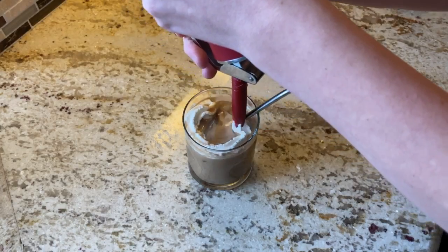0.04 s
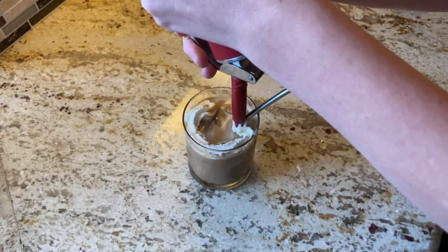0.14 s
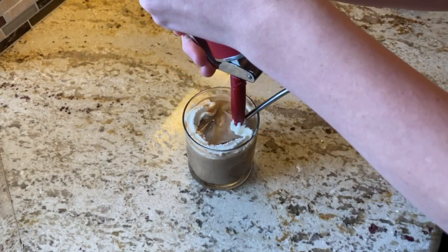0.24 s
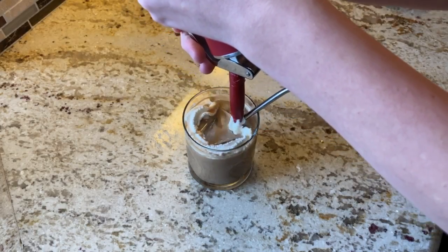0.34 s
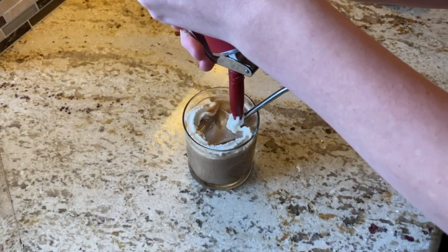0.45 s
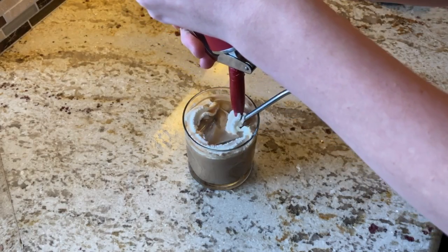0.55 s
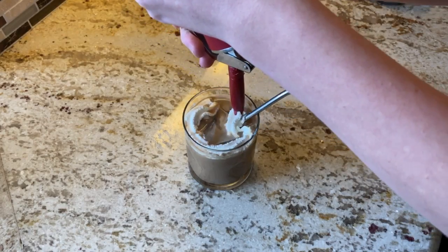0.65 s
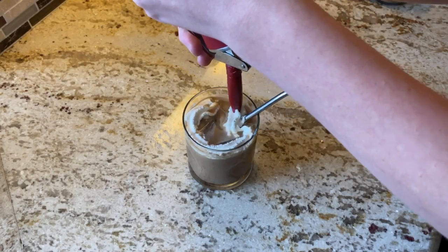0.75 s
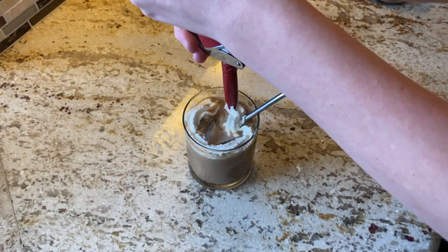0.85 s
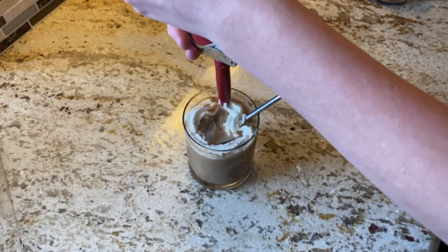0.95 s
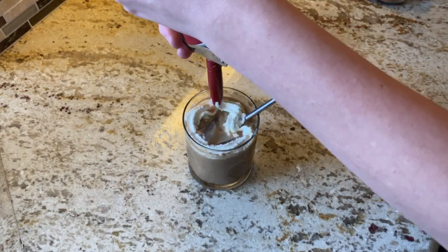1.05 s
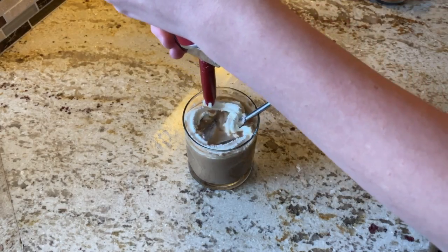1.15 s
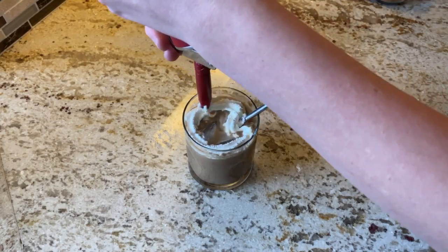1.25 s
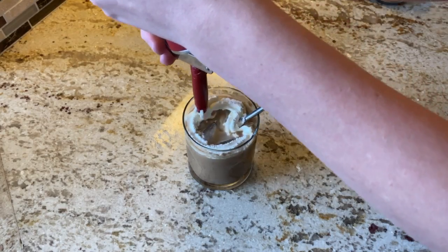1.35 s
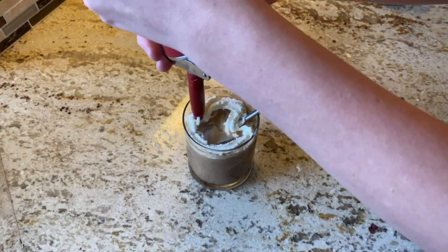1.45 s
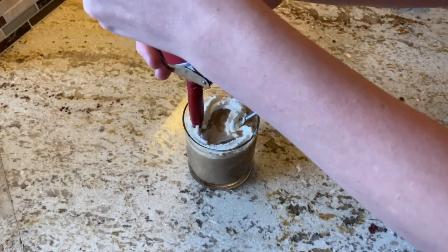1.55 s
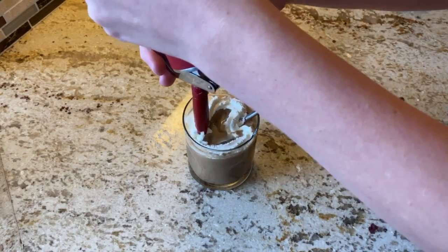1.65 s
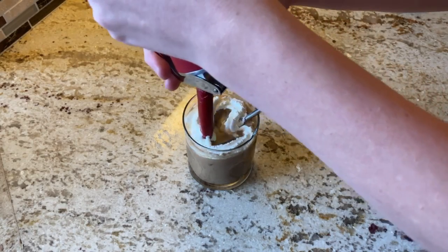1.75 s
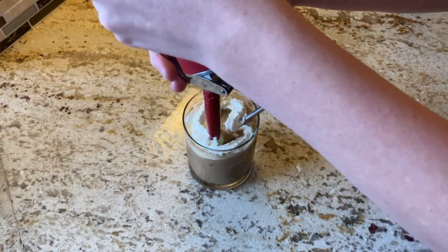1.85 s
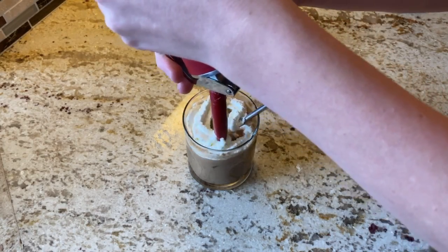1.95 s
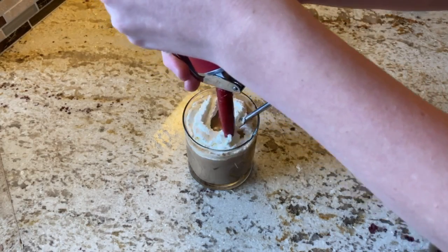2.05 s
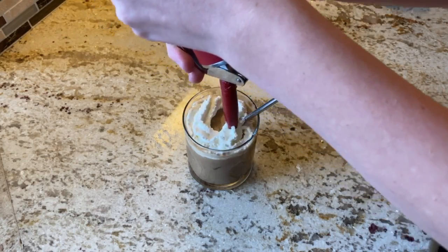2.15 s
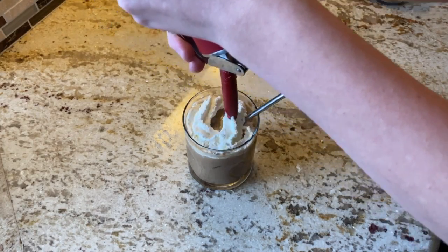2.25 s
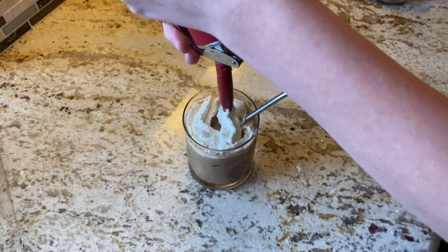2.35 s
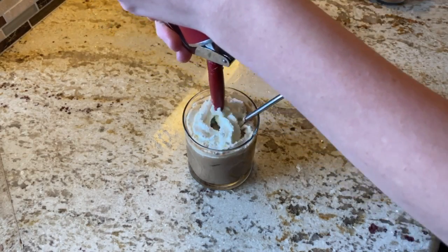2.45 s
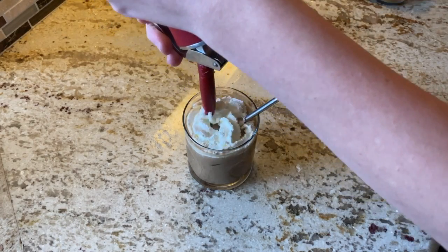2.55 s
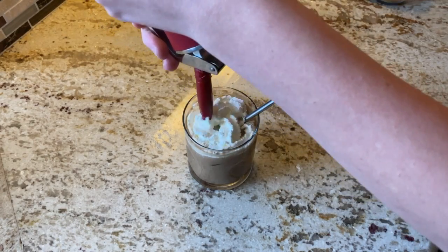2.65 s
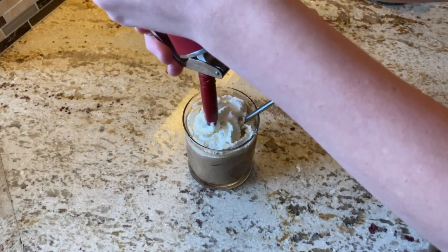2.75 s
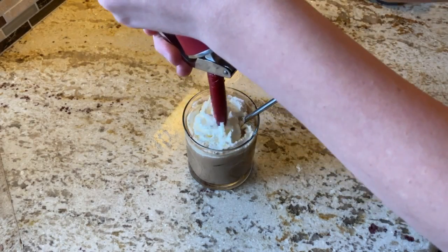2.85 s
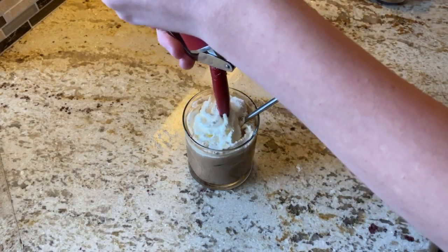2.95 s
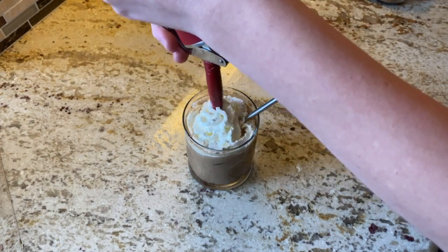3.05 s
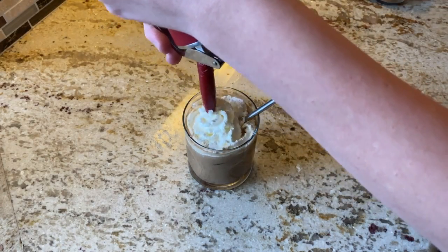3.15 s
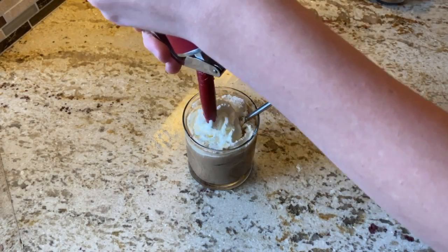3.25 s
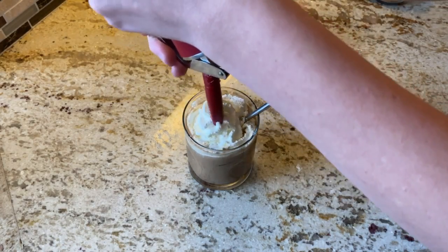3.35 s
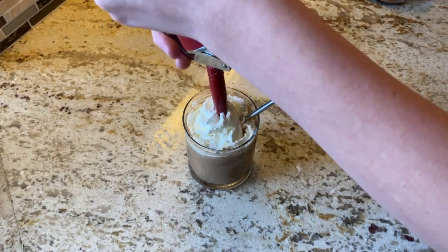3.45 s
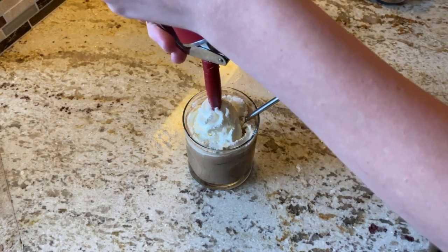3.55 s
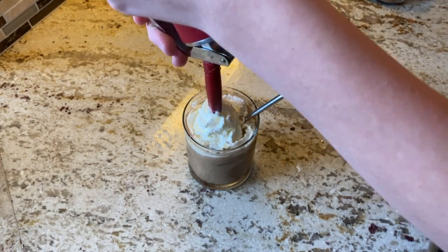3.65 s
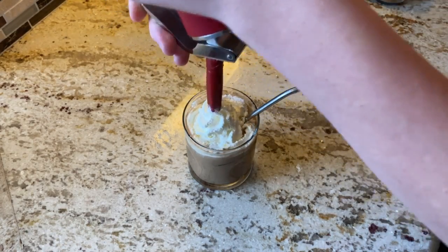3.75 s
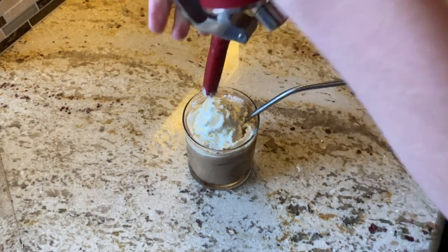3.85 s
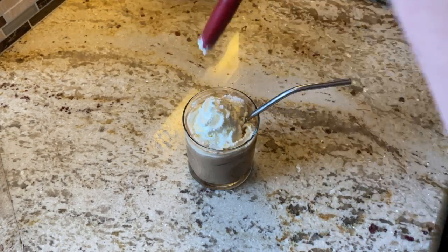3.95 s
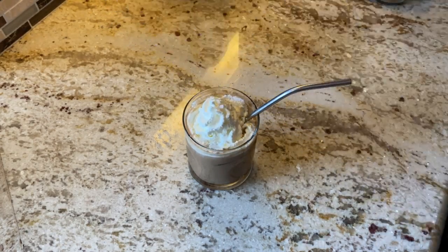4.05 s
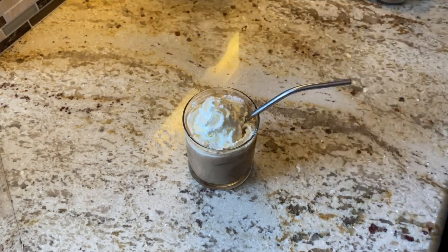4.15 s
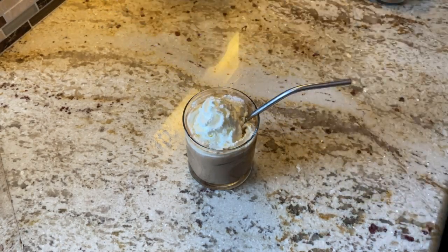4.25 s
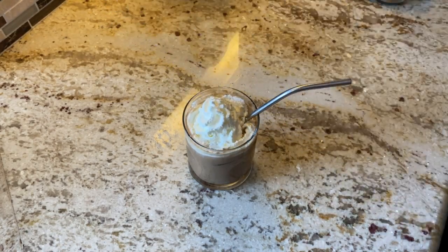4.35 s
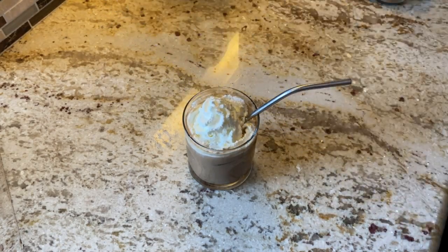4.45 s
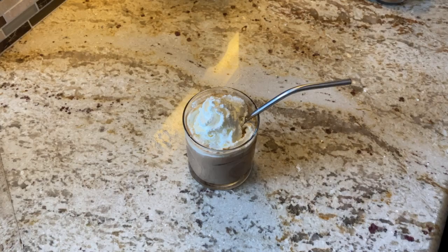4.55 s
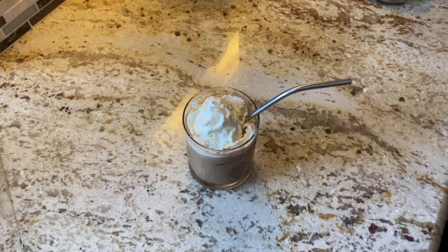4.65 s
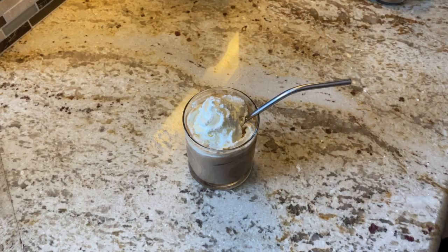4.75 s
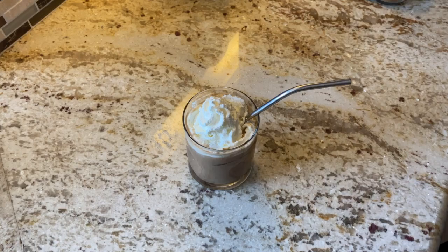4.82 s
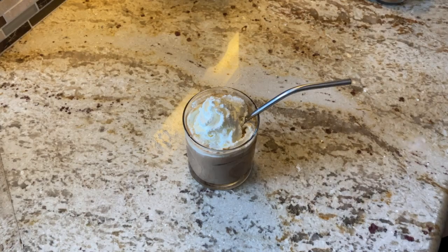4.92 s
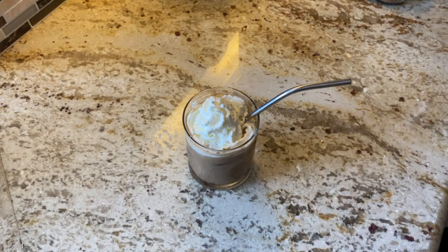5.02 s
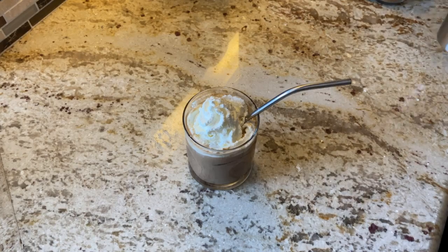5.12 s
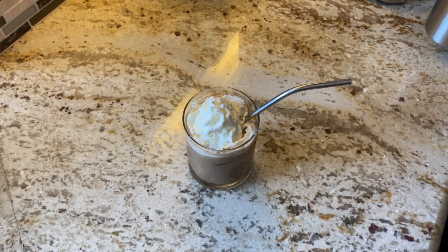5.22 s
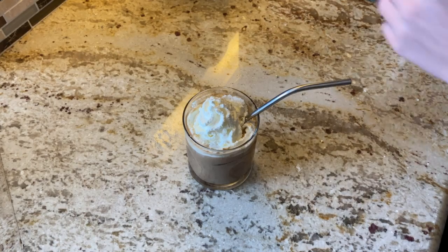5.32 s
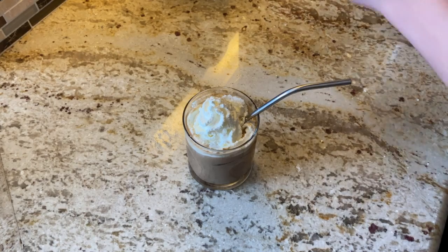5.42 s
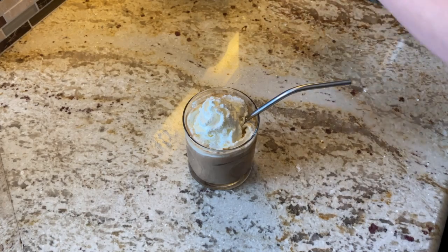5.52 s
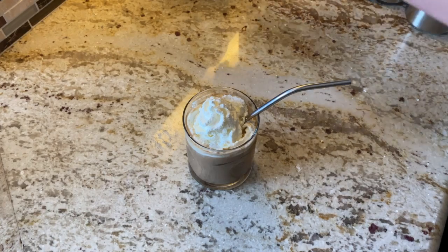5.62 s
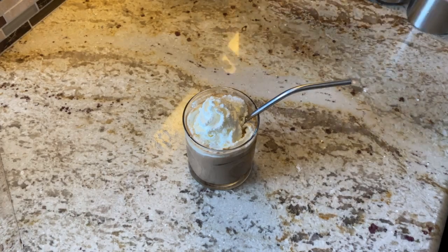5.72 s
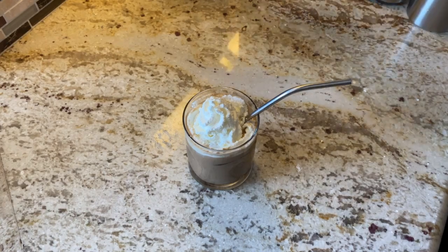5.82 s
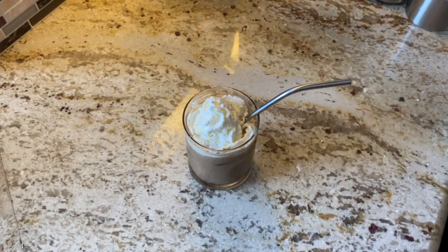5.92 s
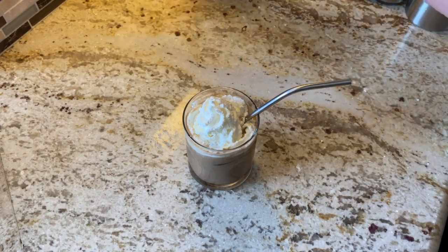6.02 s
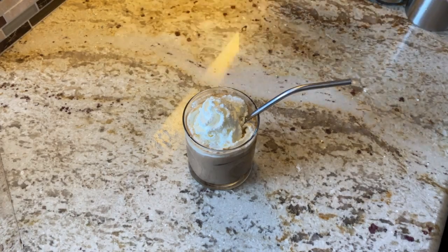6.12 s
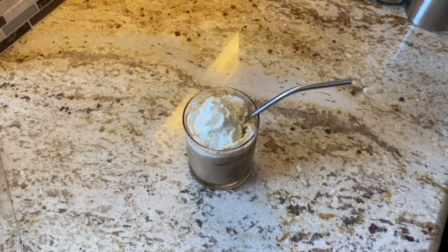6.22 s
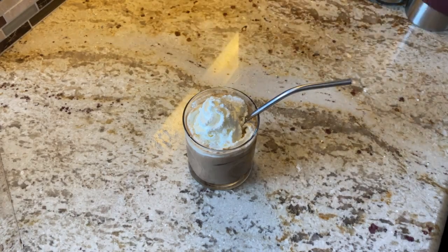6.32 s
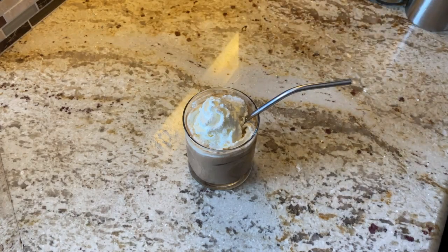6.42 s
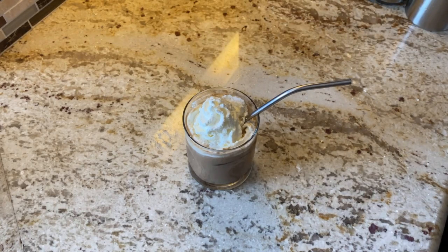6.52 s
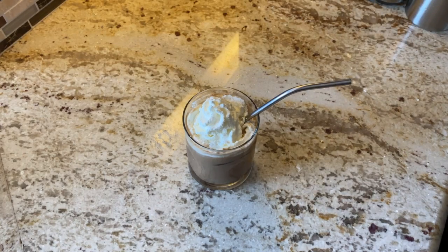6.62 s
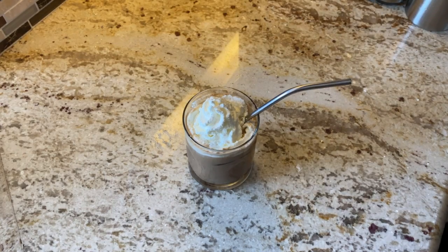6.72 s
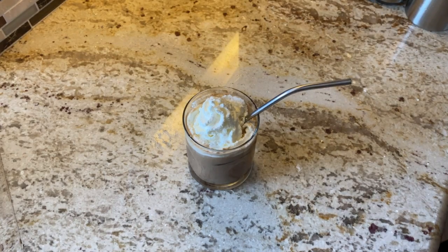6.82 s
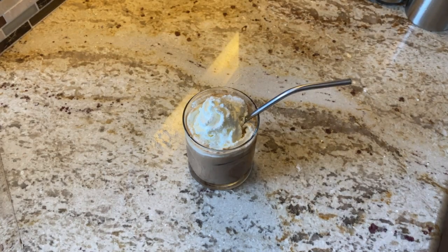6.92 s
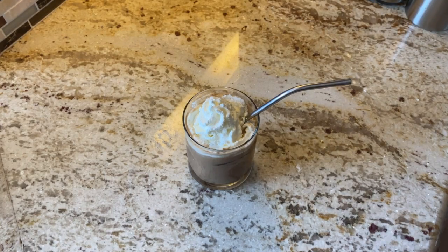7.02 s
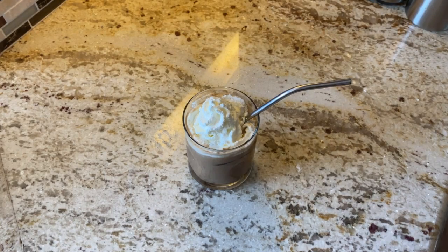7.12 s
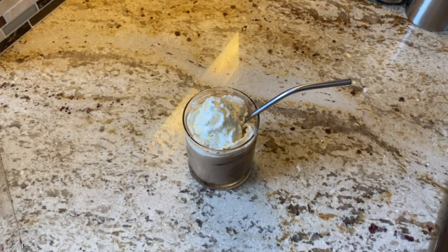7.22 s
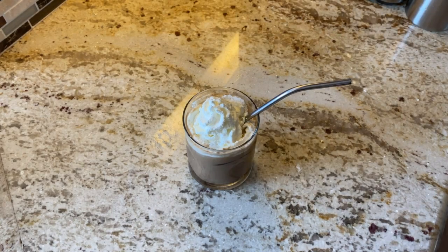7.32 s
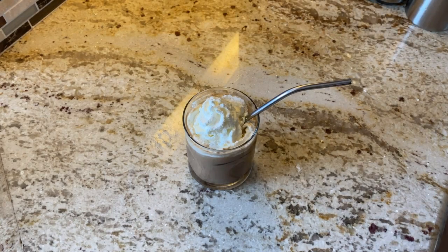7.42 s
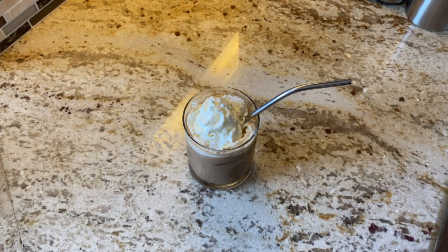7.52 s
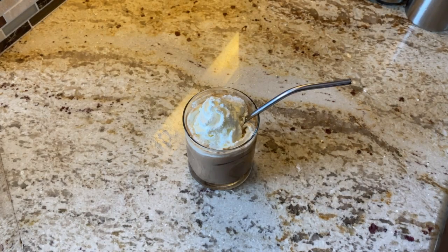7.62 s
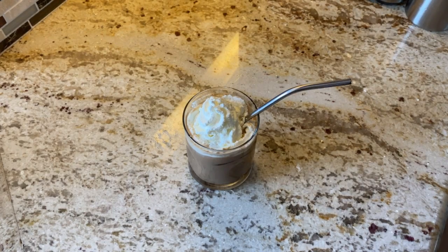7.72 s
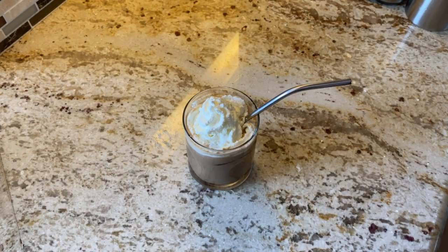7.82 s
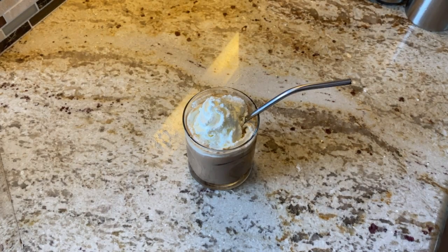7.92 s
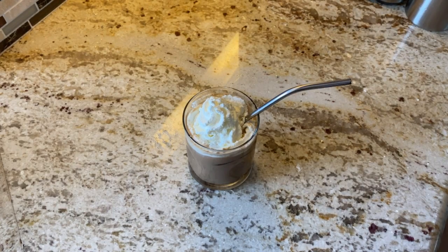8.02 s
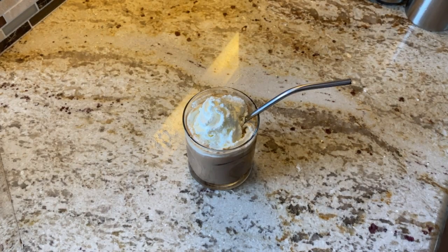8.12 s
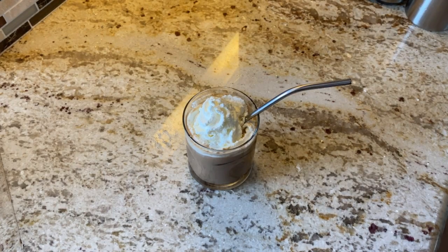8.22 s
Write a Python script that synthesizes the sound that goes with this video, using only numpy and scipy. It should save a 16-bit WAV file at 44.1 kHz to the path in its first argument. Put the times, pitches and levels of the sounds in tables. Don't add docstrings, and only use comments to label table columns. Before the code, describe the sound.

A whipped cream dispenser sputters and hisses into a glass, stops, then cloth rustles, metal knocks down twice on stone, and something clacks further right.

```python
import sys
import numpy as np
from scipy import signal
from scipy.fft import rfft, irfft
from scipy.io import wavfile
from scipy.ndimage import uniform_filter1d

SR = 44100
rng = np.random.default_rng(int(sys.argv[2]) if len(sys.argv) > 2 else 0)


def to_linear_factor(level_db):
    exponent = np.asarray(level_db, float) / 20
    return 10 ** exponent


def to_wav(sig):
    pcm = np.clip(np.atleast_2d(sig), -1, 1) * 32767
    pcm = np.round(pcm).astype(np.int16)
    wavfile.write(sys.argv[1], SR, pcm.T)


N = 364707
TIME = np.arange(N) / SR

# start in seconds, peak in dB, pitch in Hz, treble against peak in dB.
POPS = [(0.036, -40.5, 1790, -11), (0.091, -46.5, 1010, -10), (0.156, -43, 1140, -22.5),
        (0.362, -42.5, 1630, -11), (0.584, -40, 1200, -24), (0.64, -44.5, 1250, -21),
        (0.71, -40.5, 1240, -30), (0.827, -40, 1260, -27), (0.869, -44, 1190, -26), (0.965, -38, 1200, -18),
        (1.007, -38.5, 1190, -14), (1.233, -38, 1600, -13.5), (1.291, -39.5, 1830, -22),
        (1.662, -42.5, 1000, -19), (1.857, -41.5, 1290, -20), (1.984, -44, 1120, -22),
        (2.161, -40, 1190, -25), (2.213, -35.5, 1140, -21), (2.478, -45, 1180, -20),
        (2.506, -37.5, 1200, -19), (2.618, -37, 1160, -12), (2.828, -41, 1250, -11.5),
        (2.898, -38.5, 1130, -10), (2.947, -39, 1010, -24), (3.034, -36, 1140, -10), (3.095, -39, 1540, -9),
        (3.225, -37.5, 1280, -22), (3.285, -40, 1010, -20), (3.325, -40.5, 1000, -10.5),
        (3.53, -33.5, 1630, -22)]
# start in seconds, peak in dB, pitch in Hz, treble against peak in dB.
LESSER = [(0.27, -50, 1850, -16), (0.284, -42.5, 1230, -10), (0.38, -53, 1630, -14), (0.435, -44, 1010, -9),
          (0.525, -45.5, 1180, -21), (0.557, -46, 1430, -12), (0.659, -38, 1140, -12),
          (0.908, -39, 1880, -10), (0.921, -41, 1630, -20), (1.084, -41, 1010, -16),
          (1.116, -43, 1190, -15), (1.32, -39, 1020, -17), (1.382, -55, 1010, -18), (1.443, -48, 1190, -14),
          (1.461, -40, 1540, -21), (1.498, -39, 1130, -18), (1.546, -39, 1010, -22),
          (1.685, -39, 1630, -11), (1.829, -41, 1280, -15), (1.912, -37, 1630, -10),
          (2.029, -43, 1160, -17), (2.068, -36, 1300, -19), (2.081, -39.5, 1170, -19),
          (2.147, -46, 1190, -20), (2.201, -34, 1200, -29), (2.234, -35, 1170, -20),
          (2.256, -37, 1280, -22), (2.276, -41, 1420, -18), (2.298, -32.5, 1300, -19),
          (2.36, -38.5, 999, -19), (2.396, -40.5, 1180, -19), (2.423, -45, 974, -14),
          (2.528, -35.5, 1410, -20), (2.575, -42, 990, -8.5), (2.665, -37, 1630, -9.5),
          (2.698, -40, 1010, -16), (2.77, -39.5, 1180, -14), (2.978, -43, 1130, -19),
          (3.009, -45, 1040, -9), (3.068, -42, 1020, -15), (3.127, -38, 1020, -13),
          (3.147, -40.5, 1030, -7), (3.18, -34.5, 1020, -17), (3.209, -37, 1030, -21),
          (3.359, -36, 1800, -10), (3.5, -42, 1290, -7), (3.551, -38.5, 1010, -11),
          (3.598, -48, 1310, -7.5), (3.631, -47, 1020, -21)]
# time in seconds, level in dB.
FLOW = [
    (0, -61),
    (.3, -64),
    (.6, -64.5),
    (.84, -60.5),
    (1.64, -56.5),
    (2.0, -55),
    (3.1, -49),
    (3.5, -54),
    (3.78, -85),
]
# frequency in Hz, level in dB per Hz.
GAS = [(4120, -32), (7000, -1), (7630, -10.5), (8150, -4.5), (11000, 3), (15000, 12), (16000, 10.5)]
# start in seconds, peak in dB, pitch in Hz,
# ring t60 in seconds, treble in dB.
TICKS = [(3.7891, -42.5, 3150, 0.0025, -65), (3.96, -59, 2800, 0.003, -67), (4.265, -62, 2200, 0.006, -79),
         (4.3192, -52, 2500, 0.0033, -70), (4.3604, -70, 2500, .004, -65), (5.3534, -67.5, 3000, .004, -68),
         (6.2783, -42.5, 2000, 0.0019, -73), (6.553, -54.5, 4720, 0.011, -73),
         (6.695, -73, 4850, 0.093, -99.5), (7.0464, -63, 2000, 0.0031, -56.5),
         (7.7878, -59, 3160, 0.018, -75)]
# start in seconds, level in dB, rattle in ms, sharp tick in dB.
CLACK = [
    (7.2366, -20.5, 3, -17.5),
    (7.2382, -5.5, 0.71, -14),
    (7.2435, -19, 3.7, -33),
    (7.286, -28, 3., -49),
]


def unit(x):
    return x / np.sqrt(np.mean(x ** 2))


def noise():
    return rng.standard_normal((2, N))


def colour(x, points):
    hz, db = np.transpose(points)
    grid = np.maximum(np.fft.rfftfreq(4096, 1 / SR), 1)
    cepstrum = irfft(np.log(to_linear_factor(np.interp(np.log(grid), np.log(hz), db))))
    cepstrum[1:2048] *= 2
    cepstrum[2049:] = 0
    response = irfft(np.exp(rfft(cepstrum)))[None, :2048]
    return signal.oaconvolve(x, response, axes=1)[:, :N]


def band(x, hz, width):
    b, a = signal.iirpeak(min(hz, .45 * SR), hz / width, SR)
    return signal.lfilter(b, a, x)


def walk(rate):
    hold = int(SR / rate)
    steps = np.repeat(rng.standard_normal(N // hold + 1), hold)
    return 1.2 * uniform_filter1d(steps, hold)[:N]


def add(out, s, wave):
    i = int(s * SR)
    out[:, i:i + wave.shape[1]] += wave[:, :N - i]


def blip(hz, t60, phase):
    t = np.arange(int(max(t60, .001) * SR)) / SR
    decay = np.exp(-np.log(1000) * t / t60)
    onset = np.minimum(t * hz * 4, 1)
    return decay * onset * np.sin(2 * np.pi * hz * t + np.reshape(phase, (2, 1)))


def burst(ms):
    t = np.arange(int(.06 * SR)) / SR
    puff = rng.standard_normal((2, len(t))) * np.exp(-1000 * t / ms)
    lines = rfft(puff)
    even = irfft(lines / np.sqrt(uniform_filter1d(np.abs(lines) ** 2, size=15)), len(t))
    return even * np.sqrt(ms * SR / 2000) * np.exp(-250 * t / ms)


def curve(table):
    return np.interp(TIME, *np.transpose(table))


def ramp(s, rise, fall):
    t = TIME[::16]
    return np.where(t < s, (s - t) / max(rise, .002), (t - s) / max(fall, .002))


def fine(slow):
    return np.repeat(slow, 16, axis=1)[:, :N]


def room(x, gap_ms=6):
    # frequency in Hz, t60 in seconds.
    kitchen = [(125, 0.74), (250, 0.71), (500, 0.51), (1000, 0.69), (2000, 0.6), (4000, 0.46),
               (8000, 0.056), (14000, 0.33)]
    t = np.arange(int(.8 * SR)) / SR
    tail = np.zeros((2, len(t)))
    for hz, t60 in kitchen:
        octave = band(rng.standard_normal((2, len(t))), hz, 1.12 * hz)
        tail += octave * np.exp(-np.log(1000) * t / t60)
    tail *= 1 - np.exp(-1000 * t / gap_ms)
    return signal.fftconvolve(x, tail / np.sqrt(np.sum(tail ** 2) / 2), axes=1)[:, :N]


def drone(hz, width):
    phase = 2 * np.pi * np.cumsum(hz + width * walk(13)) / SR
    return np.sqrt(2) * np.sin(phase + [[0], [min(hz / 900, 1.1)]])


def fridge():
    # frequency in Hz, width in Hz, level in dB.
    hum = [(47, 12, -70.5), (66.7, 20, -79), (90.4, 5., -66.5), (120.4, 13, -69.5), (181.4, 6.2, -75.5),
           (267.3, 14, -75), (393.6, 18, -77.5)]
    # frequency in Hz, level in dB.
    whine_tones = [(1179, -85), (2541, -78.5), (2600, -85.5)]
    # time in seconds, level in dB.
    swells = [(0, -70), (.45, -64), (1.15, -58.5), (1.63, -66.5), (2.21, -64), (2.88, -67.5), (3.43, -67),
              (3.85, -70), (4.3, -66), (5.39, -62.5), (6.2, -65.5), (6.6, -65.5), (8.27, -65)]
    # frequency in Hz, level in dB per Hz.
    floor_colour = [(40, -88), (130, -93), (250, -94), (480, -94),
                    (650, -107), (1200, -111), (1700, -117), (3000, -114), (5000, -119), (9000, -127), (16000, -135)]
    lines, whine = np.zeros((2, 2, N))
    for hz, width, db in hum:
        level = to_linear_factor(db + 1.6 * walk(7.5))
        lines += level * (0.71 * drone(hz, width * .6) + 0.33 * unit(band(noise(), hz, 1.1 * width)))
    for hz, db in whine_tones:
        whine += to_linear_factor(db - 4.1 + 1.2 * walk(5)) * drone(hz, 1.5)
    floor = to_linear_factor(1.2 * walk(2)) * np.sqrt(SR / 2) * colour(noise(), floor_colour)
    return lines * to_linear_factor(curve(swells)) * to_linear_factor(64.0) + whine + floor


def strokes():
    # loudest at seconds, seconds to rise 20 dB, seconds to fall 20 dB #
    # (below .002, also negative, counts as .002: at once), swish in dB, brightness in dB.
    moves = [(3.962, -1.73, -0.83, -66, 5), (4.15, 2.5, 11, -99, 13), (4.325, -1, 0.39, -67.5, -0.5),
             (4.564, -0.6, -0.34, -63.5, 5), (4.7, 0.02, 0.07, -77.5, -8.5), (4.911, 0.09, -0.44, -66.5, 0),
             (5.0, 1.5, 0.15, -77.5, 2), (5.46, 0.1, 0.9, -67, -0.5), (6.06, 0, 0.4, -82.5, -14),
             (6.185, -1.6, 0.5, -74.5, -2.5), (6.55, 0.2, 0.08, -66.5, 4), (6.7, -1.3, 0.35, -79.5, 5),
             (6.92, 0.36, 0.2, -87, -13), (7.044, -0.67, 0.36, -61.5, -0.5), (7.227, -0.01, 2.5, -61, 4)]
    rub_db, sheen_db = 1, 6.5
    swell = np.array([to_linear_factor(2 * db - 40 * ramp(s, rise, fall)) for s, rise, fall, db, _ in moves])
    bright_db = np.transpose(moves)[4]
    mix = to_linear_factor([rub_db - bright_db, 0 * bright_db, sheen_db + bright_db]) ** 2
    return fine(np.sqrt(mix @ swell)) * (TIME < CLACK[1][0])


def rustle():
    # frequency in Hz, level in dB per Hz.
    rub_colour = [(300, -29), (600, 0.5), (1200, 0.5), (1900, -1), (2600, -6), (4000, -36)]
    swish_colour = [(1500, -16.5), (2700, -3), (4700, -4), (6800, -5), (9000, -25)]
    rub, swish, sheen = strokes()
    out = unit(colour(noise(), rub_colour)) * rub * to_linear_factor(1.6 * walk(27))
    out = out + unit(colour(noise(), swish_colour)) * swish * to_linear_factor(1.7 * walk(27))
    out = out + unit(colour(noise(), GAS)) * sheen * to_linear_factor(1.4 * walk(76))
    bright = np.zeros((2, N))
    for (s, db, hz, t60, top_db), phase in zip(TICKS, 9.3 * rng.random((len(TICKS), 2))):
        add(out, s, to_linear_factor(db + 5) * blip(hz, t60, phase))
        add(bright, s, to_linear_factor(top_db + 10.5) * burst(1.0))
    return out + band(bright, 8000, 14000)


def knock(contacts, tone, ring):
    split, partner_db = .012, -9
    rattle, tick, modes = np.zeros((3, 2, N))
    for s, db, ms, tick_db in contacts:
        add(rattle, s, to_linear_factor(db + 16.5) * burst(ms))
        add(tick, s, to_linear_factor(tick_db) * burst(1.0 * ms))
    blow_s = max(contacts, key=lambda c: c[1])[0]
    for (hz, db, t60, late_ms), phase in zip(ring, 6.14 * rng.random((len(ring), 2))):
        ear_phase = phase * min(hz / 500, 1)
        for off, gain in (0, 1), (split, to_linear_factor(partner_db)):
            add(modes, blow_s + late_ms / 1000, gain * to_linear_factor(db) * blip(hz * (1 + off), t60, ear_phase))
    sharp = band(tick, 8200, 3500) + to_linear_factor(-3) * band(tick, 13300, 3500)
    return colour(rattle, tone) + sharp + modes


def clack():
    # frequency in Hz, level in dB per Hz.
    tone = [(60, -45), (200, -23.5), (400, -16), (900, -12), (1600, -8.5), (2200, -8), (2900, -15.5),
            (3600, -19), (4000, -21.5), (6200, -33), (16000, -55.5)]
    # frequency in Hz, level in dB, t60 in seconds, late by ms.
    ring = [(212.7, -38, 0.084, 8.3), (362, -30.5, 0.065, 27), (456, -35.5, 0.1, 6.5), (970, -27, 0.045, 3),
            (1290, -29.5, 0.13, 1.47), (1830, -28, 0.095, 0.34), (2033, -26, 0.07, 6),
            (2285, -32, 0.046, .3), (2497, -18, 0.035, .3), (2490, -36, .16, 0.37), (2826, -20, 0.053, .3),
            (3150, -33, 0.046, 0.4), (3480, -32.5, .11, 2.9), (3650, -35, 0.1, 3.5)]
    return knock(CLACK, tone, ring)


def rim_knock():
    # start in seconds, level in dB, rattle in ms, sharp tick in dB.
    contacts = [
        (5.5005, -16, 3.5, -35.5),
        (5.504, -13.5, 2.4, -34),
        (5.5085, -7.5, 1.1, -33),
        (5.545, -33, 5., -61.5),
        (5.609, -30, 5.5, -73.5),
    ]
    # frequency in Hz, level in dB per Hz.
    tone = [(35, -46.5), (60, -28), (230, -12), (500, -17), (1000, -10.5), (1600, -11.5), (1850, -19.5),
            (4300, -26), (8000, -36.5), (16000, -29.5)]
    # frequency in Hz, level in dB, t60 in seconds, late by ms.
    ring = [(116, -31, 0.11, 7), (205, -30.5, 0.09, 3), (262, -28.5, 0.078, 7), (730, -28, .06, -3.5),
            (964, -27.5, 0.057, -5), (1200, -19, 0.041, -4.5), (1448, -24, .04, -3),
            (2700, -33, 0.03, -4.5)]
    return knock(contacts, tone, ring)


def base_knock():
    # start in seconds, level in dB, rattle in ms, sharp tick in dB.
    contacts = [
        (5.7205, -36, 21, -40.5),
        (5.7362, -13.5, 1.2, -16.5),
        (5.7380, -10.5, 1.5, -30),
        (5.7415, -9, 3.4, -37),
        (5.7470, -19.5, 6.5, -44.5),
        (5.770, -28, 7.6, -54),
        (5.818, -35, 4., -65),
        (5.965, -45, 3.3, -71),
    ]
    # frequency in Hz, level in dB per Hz.
    tone = [(35, -26), (60, -13.5), (180, -8.5), (400, -13), (800, -2.5), (1300, -4.5), (1850, -10.5),
            (2100, -15), (3500, -21.5), (8300, -37), (16000, -49.5)]
    # frequency in Hz, level in dB, t60 in seconds, late by ms.
    ring = [(73, -30, 0.078, 11.5), (123.5, -27, 0.143, 8), (261.4, -36, 0.15, 2.5), (392, -34.5, .1, 1.5),
            (622, -23.5, 0.06, -3.5), (843, -14, 0.035, -4), (1010, -32, 0.08, -2.5),
            (1140, -19.5, 0.048, -4), (1357, -21, .08, -3.5), (1478, -24, 0.081, -3.5),
            (1832, -26.5, .06, -4)]
    return knock(contacts, tone, ring)


def thuds():
    # start in seconds, level in dB, frequency in Hz, t60 in seconds.
    rocks = [
        (5.61, -30.5, 750, 0.026),
        (5.622, -33.5, 280, 0.033),
        (5.966, -39.5, 1680, 0.048),
        (5.886, -28.5, 546, 0.024),
        (5.889, -35, 129, 0.087),
        (6.032, -35.5, 166.4, 0.019),
        (6.035, -53, 452, 0.027),
    ]
    out = np.zeros((2, N))
    for s, db, hz, t60 in rocks:
        add(out, s, to_linear_factor(db) * blip(hz, t60, [0, hz / 400]))
    return out


def valve():
    shut_s = TICKS[0][0]
    fade = (TIME > shut_s) * to_linear_factor(-240 * np.abs(TIME - shut_s))
    return to_linear_factor(-67) * unit(band(noise(), 3700, 1300)) * fade


def flecks():
    # start in seconds, peak in dB, pitch in Hz.
    spits = [(0.0563, -59, 4520), (0.0987, -44.5, 5250), (0.2902, -46.5, 4800), (0.4359, -54, 5170),
             (0.5576, -62, 5020), (0.5851, -54, 4630), (0.6407, -48.5, 4870), (0.7098, -63, 5060),
             (0.7362, -51, 6500), (1.007, -49, 5700), (1.0355, -52, 5230), (1.0844, -52, 4750),
             (1.1164, -47, 5770), (1.1803, -43, 5090), (1.2326, -51, 5140), (1.2915, -59, 4620),
             (1.3174, -53, 4560), (1.5938, -58, 6350), (1.6626, -61, 4880), (1.6931, -60, 6430),
             (1.722, -51, 4710), (1.7973, -58, 5810), (1.9111, -55, 4500), (2.173, -49, 4860),
             (2.2752, -63, 4880), (2.2967, -50, 6550), (2.397, -60, 5060), (2.4224, -48, 6360),
             (2.4773, -62, 4840), (2.5057, -49, 5060), (2.583, -48, 6450), (2.608, -48, 4500),
             (2.6963, -48, 6240), (2.8275, -46, 6130), (2.906, -45, 6330), (2.9387, -46, 6440),
             (3.0332, -38, 6300), (3.0944, -44, 5800), (3.1263, -43, 6330), (3.1557, -38, 6000),
             (3.334, -47, 6060), (3.3558, -46, 6030), (3.3905, -40, 6600), (3.4695, -51, 6480),
             (3.489, -44, 6330), (3.551, -44, 6360), (3.598, -45, 6490), (3.6287, -53, 6500),
             (3.7294, -64.5, 5830)]
    trim_db, length_ms, width_hz = 7.5, 5.4, 1660
    out = np.zeros((2, N))
    for s, db, hz in spits:
        puff = band(band(burst(length_ms), hz, width_hz), hz, width_hz)
        add(out, s, to_linear_factor(db + trim_db) * puff)
    return out


def clogging(table):
    choke_s, choke_db, ease_s, ease_db = 0.016, -10.5, 0.023, -1.5
    times = np.sort(np.transpose(table)[0])
    after = np.searchsorted(times, TIME)
    to_next = np.append(times, N)[after] - TIME
    since = TIME - np.append(-N, times)[after]
    return choke_db * np.exp(-to_next / choke_s) + ease_db * np.exp(-since / ease_s)


def stream():
    # peak in seconds, rise in seconds, fall in seconds,
    # froth in dB, jet in dB.
    surges = [(.097, 0.0078, 0.14, 6, 9), (.365, 0.0073, 0.013, -7, -4), (.44, 0.008, 0.019, -4, 0),
              (.5, 0.13, 0.044, -8, -3), (.79, 0.086, 0.052, 6.5, 0.5), (1.055, 0.059, 0.032, -25, -3),
              (1.3, 0.5, 0.054, 3, 3), (1.635, 0.091, 0.042, -4.5, -2.5), (2.03, 0.21, 0.084, 7, 6.5),
              (2.135, 0.039, 0.02, -14, -1), (2.61, 0.037, 0.042, 4.5, 7.5), (2.79, 0.052, 0.039, -9, -0.5),
              (3.035, 0.01, 0.33, -1.5, 3.5), (3.4, 0.064, 0.042, -2, 6), (3.49, 0.015, 0.025, 9.5, 2),
              (3.545, 0.011, 0.084, -9, 3), (3.684, 0.021, 0.017, -26, 13.5)]
    froth_db, froth_slope = -49.5, 1.14
    squirt_db, squirt_slope = -61.5, 0.51
    gas_db, gas_slope = -62, 0.63
    gas_per_jet = 0.57
    lesser_choke, jet_share = 0.54, 0.26
    spurt_s, spurt_hold_s, spurt_fall_s, spurt_db = .734, .065, .11, 17.5

    flow = curve(FLOW) + 52
    shapes = np.array([np.maximum(1 - ramp(s, rise, fall), 0) for s, rise, fall, *_ in surges])
    froth, jet = fine(np.transpose(surges)[3:] @ shapes)
    clog = clogging(POPS) + lesser_choke * clogging(LESSER)
    froth, jet = froth + clog, jet + jet_share * clog
    thinning = np.clip(1 - (TIME - spurt_s - spurt_hold_s) / spurt_fall_s, 0, 1)
    spurt = spurt_db * (TIME > spurt_s) * thinning
    shut = -20 * np.maximum(TIME - FLOW[-1][0] + 0.093, 0) / 0.034
    return (to_linear_factor(froth_db + froth_slope * flow + froth + shut),
            to_linear_factor(squirt_db + squirt_slope * flow + jet + spurt + shut),
            to_linear_factor(gas_db + gas_slope * flow + gas_per_jet * jet + shut))


def pops():
    lesser_db, fizz_db, fizz_slope = -3, -18, 2.84
    rows = POPS + [(s, db + lesser_db, hz, top_db) for s, db, hz, top_db in LESSER]
    return [(s, db, hz, db + fizz_db + fizz_slope * (top_db + 19.5)) for s, db, hz, top_db in rows]


def spray():
    # frequency in Hz, width in Hz, level in dB.
    flask = [(216, 61, 6), (366, 28, -1.5), (539, 47, -4.5), (619, 43.4, -1), (670, 20, -9),
             (1013, 33, -6.5), (1162, 36, -6.5), (1286, 39, -9.5), (1540, 190, -13), (1630, 53, -11.5),
             (1830, 25, -5.5), (2287, 12, -6.5), (2500, 20, -9), (2814, 470, -9.5)]
    # frequency in Hz, level in dB per Hz.
    squirt_colour = [(880, -12), (1500, -1.5), (1850, -3.5), (2090, -9.5), (3050, -0.5), (3910, -3.5),
                     (4630, -1.5), (5450, -6), (6560, -3), (7540, -13), (9500, -17.5), (12400, -27),
                     (20900, -120)]
    froth, squirt, gas = stream()
    rows = pops()
    gust = 2.6 * walk(45)
    small, big, splat, fizz = np.zeros((4, 2, N))
    puffs = np.zeros((1, N))

    for u, size, pitch, a, b in rng.random((1500, 5)):
        s = u * FLOW[-1][0]
        hz = 1300 * 2 ** (1.3 * (pitch - .5))
        add(small, s, to_linear_factor(13 * size ** 2) * blip(hz, 4.5 / hz, [a, a + 3. * b]))
        puffs[0, int(s * SR)] = to_linear_factor(4.2 * b ** 3)
    for (s, db, hz, fizz_db), (a, b) in zip(rows, rng.random((len(rows), 2))):
        add(big, s, to_linear_factor(db + .3) * blip(hz, 8.5 / hz, [a, a + 1.6 * b]))
        add(splat, s, to_linear_factor(db - 5.5) * burst(7.2))
        add(fizz, s, to_linear_factor(fizz_db - 10.5) * burst(1.5))

    knocks = small / small[:, :3 * SR].std() * to_linear_factor(gust) * froth
    splat = band(splat, 1050, 1820)
    drive = knocks + big + to_linear_factor(10.5) * splat
    ring = sum(to_linear_factor(db) * band(drive, hz, width) for hz, width, db in flask)
    sputter = signal.lfilter([1], [1, -np.exp(-1000 / SR / 4.7)], puffs)
    sputter = .35 + sputter / sputter[:, :3 * SR].std()
    spit = unit(colour(noise(), squirt_colour)) * squirt * to_linear_factor(-3.0 + 0.067 * gust) * sputter ** 0.61
    hiss = unit(colour(noise(), GAS)) * gas * to_linear_factor(2.0 + 0.85 * gust) * sputter ** 1.055
    body = to_linear_factor(8.0) * ring + to_linear_factor(-11.5) * knocks + big + splat
    return body + spit + hiss + colour(fizz, GAS) + flecks()


def scene():
    floor = fridge()
    far, rim, base = clack(), rim_knock(), base_knock()
    near = rustle() + thuds() + valve() + spray()
    send = to_linear_factor(-9.0) * near + to_linear_factor(-9.5) * (rim + base) + to_linear_factor(-11.5) * far
    pan = to_linear_factor(np.array([[-1.5], [1.5]]))
    return near + rim + base + pan * far + room(send) + floor


def roll_off(x):
    return signal.sosfilt(signal.butter(12, 16650, fs=SR, output="sos"), x)


def record(dry):
    # frequency in Hz, level in dB.
    port = [(20, -43.5), (33, -22), (45, 4), (7000, 0.5), (7650, 0.5), (8200, 7), (9000, 3.5), (15700, -8),
            (16100, -34), (17000, -50)]
    # frequency in Hz, level in dB.
    width = [(30, -8.5), (180, -10), (400, -3), (1200, 0.5), (7000, 0), (9500, 0.5), (11000, -12.5),
             (16000, -21)]
    port_lag_s, lag_top_hz = .0004, 250
    mid = colour(dry.mean(axis=0, keepdims=True), port)
    side = colour(colour((dry[:1] - dry[1:]) / 2, port), width)
    bass = signal.sosfiltfilt(signal.butter(2, lag_top_hz, fs=SR, output="sos"), mid)
    side = side - port_lag_s * SR / 2 * np.gradient(bass, axis=1)
    return roll_off(np.vstack([mid + side, mid - side]))


dry = scene()
out = record(dry)
to_wav(out)
```